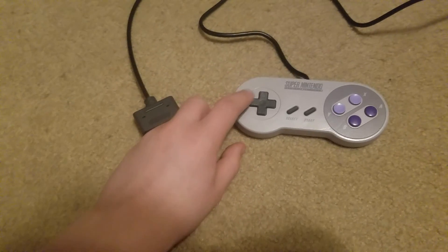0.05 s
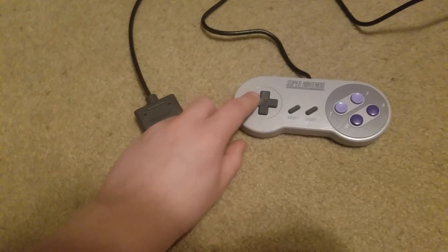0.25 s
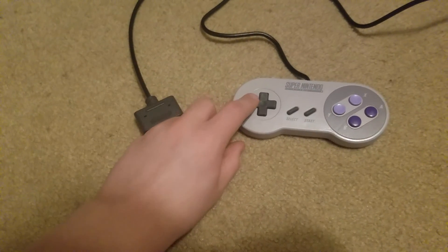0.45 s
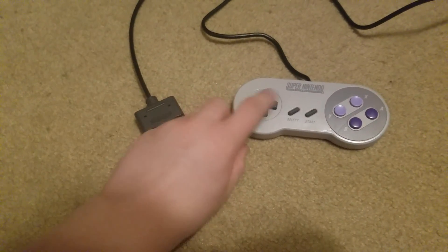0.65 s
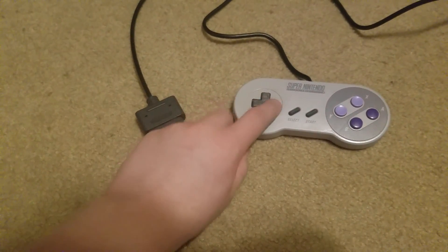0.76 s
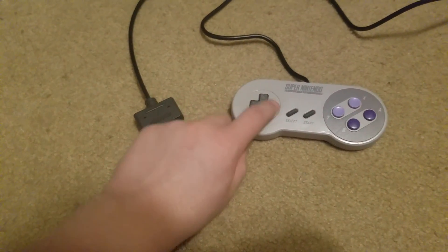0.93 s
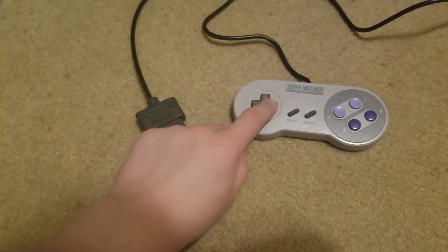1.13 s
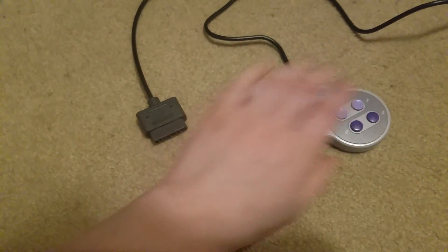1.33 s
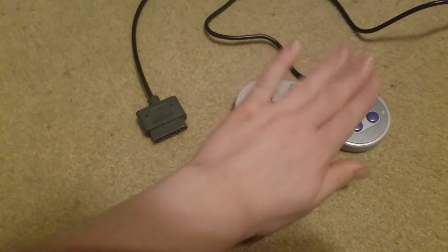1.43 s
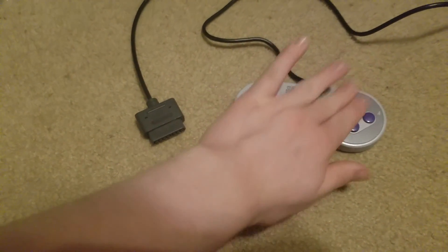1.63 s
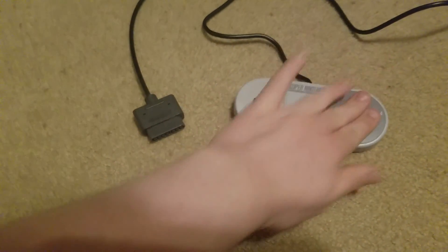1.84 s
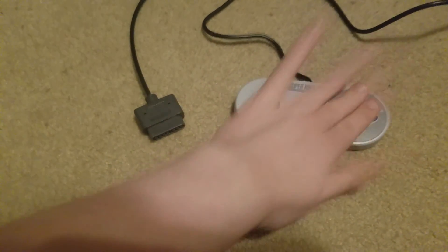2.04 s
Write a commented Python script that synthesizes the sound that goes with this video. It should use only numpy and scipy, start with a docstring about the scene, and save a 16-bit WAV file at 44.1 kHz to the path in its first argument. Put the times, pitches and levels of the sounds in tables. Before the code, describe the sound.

A game controller clicking under a finger, then three slaps with thumps and button rattles.

```python
"""Over a low hum, a finger faintly rubs and rocks the clicking direction pad of a plastic game controller.
Then the hand slaps the buttons three times: the case thumps on the carpet, the loose buttons rattle,
and after the first two slaps they tick back up as the fingers lift. Each contact is a brief force that
excites damped modes of the plastic. The small, quiet room adds a short reverberation."""
import sys
import numpy as np
from scipy import signal
from scipy.fft import rfft, irfft, next_fast_len
from scipy.io import wavfile

SR = 44100
rng = np.random.default_rng(int(sys.argv[2]) if len(sys.argv) > 2 else 0)


def unload_audio(sound):
    """Save the sound as a 16-bit wav file, at the path given as the first command line argument."""
    columns = np.transpose(np.atleast_2d(sound))
    # keep every value between -1 and 1, then stretch to whole-number steps
    steps = np.round(np.clip(columns, -1, 1) * 32767)
    wavfile.write(sys.argv[1], SR, steps.astype(np.int16))


N = 91728

# spectrum of the room air: (frequency [Hz], relative density [dB])
AIR_SPECTRUM = [(25, -14), (50, -4), (90, -5), (125, -6.5), (170, -8.5), (320, -9.5), (850, -17),
                (1300, -20.5), (2400, -24), (4600, -27.5), (8500, -35.5), (14500, -25)]
# likeness of diffuse sound at the two ears: (frequency [Hz], correlation [1])
EAR_COHERENCE = [(30, 0), (100, 0.63), (600, 0.19), (1500, 0.12), (4000, 0), (15000, 0.069)]
AIR_DB, HUM_HZ, HUM_DB = -67, 109.4, -71
# colour of the reverberant tail: (frequency [Hz], gain [dB])
ROOM_SPECTRUM = [(100, -7.5), (250, -17.5), (430, -9), (900, -10), (1700, -8.5), (3000, -7.5),
                 (6000, -12.5), (15000, -12.5)]
# reverberation time: (frequency [Hz], time to fall 60 dB [s])
ROOM_DECAY = [(100, 0.21), (500, 0.19), (2000, 0.18), (6000, 0.19), (15000, 0.15)]
ROOM_BUILD_S, WALL_ECHO_S, WALL_ECHO_DB, WALL_ECHO_HZ = 0.00092, .035, -21, 1970

# modes of the shell: (frequency [Hz], gain [dB], bandwidth [Hz], left minus right [dB])
SHELL_MODES = [(1410, -11.5, 244, -3), (1856, -4.5, 148, -1.5), (2052, -4.5, 220, -10.5),
               (2544, 0, 208, -10), (2730, -3, 367, -12.5), (3007, -2, 254, -6), (4110, -6, 285, -9),
               (5320, -15.5, 260, -10.5), (5500, -14, 190, -2)]
# hollow modes of the pad: (frequency [Hz], gain [dB], bandwidth [Hz], left minus right [dB])
PAD_MODES = [(1830, 2, 150, -4.5), (4070, 0, 230, -10), (5470, -5, 150, -18), (8000, -12, 100, -12)]
# deep and upper mode of the case on the carpet: (frequency [Hz], bandwidth [Hz])
CASE_MODES = [(122, 68), (315, 139)]
# the crack, a blur of short high modes: (frequency [Hz], gain [dB])
CRACK_SPECTRUM = [(400, -23), (700, -8), (1000, -18.5), (1500, -2), (3400, -11), (5300, -4.5), (8200, -5),
                  (10000, -8), (14000, -7.5), (16000, -13.5)]
# stereo balance of cracks and ticks: (frequency [Hz], left minus right [dB])
SNAP_BALANCE = [(1500, -3), (2500, -7), (5000, -8), (8000, -10.5), (10500, -1.5), (15000, 2.5)]
CRACK_RING_S = 0.00103

# loudness of skin rubbing on the pad: (time [s], level [dB])
RUB_LEVEL = [(0, -79.5), (.12, -71), (0.211, -64.5), (0.328, -72), (.42, -65), (.52, -66.5), (.65, -75),
             (.85, -74.5), (1.2, -72.5)]
# spectrum of the rubbing: (frequency [Hz], relative density [dB])
RUB_SPECTRUM = [(700, -9), (1400, -9), (1700, -5.5), (1870, 1.5), (2100, -7.5), (2700, -11), (4000, -18.5),
                (8000, -33)]

# buttons springing back: (time [s], tick [dB], scuff decay [s], ping [Hz], ping [dB], knock [dB])
BUTTON_LIFTS = [(1.5753, -29, 0.0025, 5300, -21, -35), (1.5879, -16, 0.0013, 7730, -8, -28),
                (1.5965, -17, .0007, 2050, -12.5, -22.5), (1.8337, -21, 0.002, 5060, -11, -20.5),
                (1.8395, -18.5, 0.0012, 5100, -17, -23), (1.8598, -14, 0.0043, 5160, -17, -23.5),
                (1.8681, -23, 0.0015, 3130, -18, -25), (1.8759, -19, 0.00059, 3240, -12, -18.5),
                (1.8787, -7, 0.00087, 2190, -1.5, -9)]
# colour of a button's tick: (frequency [Hz], gain [dB])
TICK_SPECTRUM = [(450, -12.5), (1000, -21), (1500, -0.5), (3400, -4.5), (5000, -0.5), (7500, -6),
                 (10000, -7), (15000, -8)]
LIFT_KNOCK_HZ, LIFT_KNOCK_WIDTH_HZ, PING_WIDTH_HZ = 690, 283, 245
TICK_EDGE_HZ, TICK_DB_PER_OCTAVE = 25000, 14   # a tick's top edge falls from here as it gets softer

# clicks of the pad: (time [s], shell ring [dB], crack [dB], scuff decay [s], hollow tone [dB])
PAD_CLICKS = [(0.1292, -17.5, -57, .0002, -37.5), (0.3744, -3, -27.5, 0.00031, -14.5),
              (0.699, -30, -35.5, .001, -41), (0.7203, 3.5, -31, 0.00011, -10.5),
              (0.7297, -11, -20.5, 0.0019, -14), (0.9675, -30, -36, 0.0011, -27),
              (0.9786, -13, -12.5, 0.0016, -10), (0.9808, -4.5, -5, 0.00075, 0.5),
              (0.999, -8, -13.5, 0.00048, -7.5), (1.127, -25.5, -50, 0.0014, -43)]
CLICK_THUMP_DB = -22
PAD_SOFT_HZ, PAD_ROOM_DB = 4600, -3   # the fingertip dulls the shell; the hand shades the room

# slaps of the hand: (time [s], shell ring [dB], crack [dB], deep thump [dB], upper thump [dB],
# knock [Hz], knock [dB], rattle [dB], rattle delay [s])
HAND_SLAPS = [(1.4268, -3, 3.5, 10.5, -3, 798, -6, 3.5, .004), (1.7275, 9.5, 9, 19, 16, 660, 10, 1, 0.0062),
              (2.004, 5.5, 9, 15, 15, 783, 12, -0.5, 0.0052)]
# further fingers landing just after a slap: (time [s], shell ring [dB], crack [dB])
FINGER_LANDINGS = [(1.4351, -2.5, -4.5), (2.0222, 4.5, -5.5)]
SLAP_SCUFF_S, SLAP_CRACK_S, THUMP_LAG_S, KNOCK_WIDTH_HZ = 0.0023, 0.00081, 0.00096, 93
RATTLES_PER_S, RATTLE_FADE_S, RATTLE_RING_DB, RATTLE_CRACK_DB = 770, 0.014, 1, 1.5


def from_db(db):
    """Amplitude ratio: tenfold for every 20 dB."""
    return 10 ** (np.asarray(db) / 20)


def at_hz(points, hz):
    """Interpolation of a table on a log-frequency axis."""
    frequencies, values = np.transpose(points)
    return np.interp(np.log(np.maximum(hz, 1)), np.log(frequencies), values)


def pan(db):
    """Level difference between the ears, left minus right, at constant total power."""
    gains = np.array([from_db(np.atleast_1d(db) / 2), from_db(-np.atleast_1d(db) / 2)])
    return gains / np.sqrt(np.mean(gains ** 2, axis=0))


def colour(x, points):
    """Minimum-phase filtering: folding the cepstrum makes the given dB curve causal."""
    size = 2 * next_fast_len(x.shape[-1])
    hz = np.arange(size // 2 + 1) * SR / size
    cepstrum = irfft(np.log(from_db(at_hz(points, hz))))
    cepstrum[1:size // 2] *= 2
    cepstrum[size // 2 + 1:] = 0
    return irfft(rfft(x, size) * np.exp(rfft(cepstrum)))[..., :x.shape[-1]]


def resonate(x, hz, width_hz):
    """Forced response of a damped oscillator, with unit gain at resonance."""
    r = np.exp(-np.pi * width_hz / SR)
    feedback = [1, -2 * r * np.cos(2 * np.pi * hz / SR), r * r]
    return signal.lfilter(np.array([1, 0, -1]) * (1 - r * r) / 2, feedback, x + 1e-18)


def resonate_twice(x, hz, width_hz):
    """Two resonators in cascade, each of twice the given width, make a peak with steep skirts."""
    return resonate(resonate(x, hz, 2 * width_hz), hz, 2 * width_hz)


def add(track, s, sound):
    """Superposition: a sound joins the track at s seconds."""
    i = int(s * SR)
    track[..., i:i + sound.shape[-1]] += sound[..., :max(N - i, 0)]


def stereo_noise(size):
    """Partial coherence: white noise that is alike at the two ears mainly in the bass."""
    mid, side = rfft(rng.standard_normal((2, size)))
    alike = np.clip(at_hz(EAR_COHERENCE, np.arange(len(mid)) * SR / size), -1, 1)
    return irfft(np.sqrt(1 + alike) * mid + np.sqrt(1 - alike) * side * [[1], [-1]], size)


def hiss(spectrum):
    """Stationary coloured noise of unit rms."""
    x = colour(stereo_noise(N + SR // 4), spectrum)[:, -N:]
    return x / x.std()


def background():
    """Ambient noise floor: broadband room air and a low sinusoidal hum."""
    hum = np.sqrt(2) * np.sin(2 * np.pi * (HUM_HZ * np.arange(N) / SR + rng.random()))
    return (from_db(AIR_DB) * hiss(AIR_SPECTRUM) + from_db(HUM_DB) * hum) * pan(db=-1)


def room(x):
    """Reverberation: a diffuse tail decays exponentially in each band, and one wall gives a dull echo."""
    t = np.arange(SR // 2) / SR
    noise, tail = rfft(stereo_noise(len(t))), 0
    hz = np.arange(noise.shape[1]) * SR / len(t)
    edges_hz = np.geomspace(40, 20480, 10)
    build_up = 1 - np.exp(-(t / ROOM_BUILD_S) ** 2)
    for low, high in zip(edges_hz, edges_hz[1:]):
        band = irfft(noise * ((hz >= low) & (hz < high)), len(t))
        fade = from_db(-60 * t / at_hz(ROOM_DECAY, np.sqrt(low * high))) * build_up
        tail = tail + band * fade / np.sqrt(np.sum(fade ** 2))
    reflections = signal.fftconvolve(x, colour(tail, ROOM_SPECTRUM), axes=1)[:, :N]
    echo = signal.lfilter(*signal.butter(1, WALL_ECHO_HZ, fs=SR), x)
    add(reflections, WALL_ECHO_S, from_db(WALL_ECHO_DB) * echo)
    return reflections


def finger_rub():
    """Friction noise: skin slides faintly over the pad."""
    level_db = np.interp(np.arange(N) / SR, *np.transpose(RUB_LEVEL))
    return from_db(level_db) * hiss(RUB_SPECTRUM) * pan(db=-6)


def scuff(decay_s, flattening_passes=4):
    """Broadband excitation: the force of one contact is a dying burst of tiny slips, of unit energy."""
    fade = np.exp(-np.arange(SR // 40) / SR / decay_s)
    force = rng.standard_normal(len(fade)) * fade
    for _ in range(flattening_passes):   # even out the spectrum while keeping the burst short
        spectrum = rfft(force)
        force = irfft(spectrum / (abs(spectrum) + 1e-12), len(fade)) * np.minimum(1, 10 * fade)
    return force / np.sqrt(np.sum(force ** 2))


def crack(contact_s):
    """Modal overlap: short high modes blur into a snap of noise, different at each ear."""
    return np.array([scuff(contact_s / 2 + CRACK_RING_S) for _ in range(2)])


def radiate(snap, spectrum):
    """Frequency-dependent radiation: a snap is coloured and leans to one side, band by band."""
    hz, balance_db = np.transpose(SNAP_BALANCE)
    ear_curves = [np.c_[hz, 20 * np.log10(gain)] for gain in pan(balance_db)]
    return np.array([colour(ear, curve) for ear, curve in zip(colour(snap, spectrum), ear_curves)])


def body(force, modes):
    """Modal superposition: one force drives modes of alternating sign, each with its own balance."""
    return sum((-1) ** k * from_db(db) * pan(pan_db) * resonate(force, hz, width_hz)
               for k, (hz, db, width_hz, pan_db) in enumerate(modes))


def case_thump(deep_force, upper_force):
    """Mass on a spring: the case bounces on the carpet in two low modes."""
    bounce = resonate(deep_force, *CASE_MODES[0]) - resonate(upper_force, *CASE_MODES[1])
    return signal.sosfilt(signal.butter(2, [85, 600], "band", fs=SR, output="sos"), bounce) * pan(db=-3)


def button_lifts():
    """Elastic return: each button springs against its stop with a tick, a ping and a small knock."""
    (ping, knock), snap = np.zeros((2, N)), np.zeros((2, N))
    for s, tick_db, decay_s, ping_hz, ping_db, knock_db in BUTTON_LIFTS:
        force = scuff(decay_s)
        edge_hz = min(TICK_EDGE_HZ * 2 ** (tick_db / TICK_DB_PER_OCTAVE), SR / 2 - 1000)
        tick = signal.lfilter(*signal.butter(2, edge_hz, fs=SR), crack(decay_s))
        add(snap, s, from_db(tick_db) * tick)
        add(ping, s, from_db(ping_db) * resonate(force, ping_hz, PING_WIDTH_HZ))
        add(knock, s, from_db(knock_db) * force)
    knock = resonate_twice(knock, LIFT_KNOCK_HZ, LIFT_KNOCK_WIDTH_HZ)
    return radiate(snap, TICK_SPECTRUM) + ping * pan(db=-14.5) + knock


def pad_clicks():
    """Impact excitation: the rocking pad cracks, rings the shell and its own modes, and jolts the case."""
    ring, hollow, snap = np.zeros(N), np.zeros(N), np.zeros((2, N))
    for s, ring_db, crack_db, decay_s, hollow_db in PAD_CLICKS:
        add(ring, s, from_db(ring_db) * scuff(decay_s))
        add(hollow, s, from_db(hollow_db) * scuff(decay_s))
        add(snap, s, from_db(crack_db) * crack(decay_s))
    push = from_db(CLICK_THUMP_DB) * (ring + 3.7 * hollow)
    dulled = signal.lfilter(*signal.butter(2, PAD_SOFT_HZ, fs=SR), ring)
    ringing = body(dulled, SHELL_MODES) + body(hollow, PAD_MODES)
    return ringing + radiate(snap, CRACK_SPECTRUM) + case_thump(push, push)


def button_rattle():
    """Random collisions: loose buttons chatter in their holes and settle; unit energy."""
    t = np.arange(SR // 10) / SR
    hits = rng.random(len(t)) < RATTLES_PER_S / SR
    force = hits * rng.choice([-1, 1], len(t)) * np.exp(-t / RATTLE_FADE_S)
    return force / np.sqrt(np.sum(force ** 2) + 1e-12)


def hand_slaps():
    """Impulse response: the slapped controller rings, cracks, knocks and thumps; its buttons rattle."""
    (ring, deep, upper, knock), snap = np.zeros((4, N)), np.zeros((2, N))
    tap = signal.unit_impulse(SR // 10)
    for s, ring_db, crack_db, deep_db, upper_db, knock_hz, knock_db, rattle_db, delay_s in HAND_SLAPS:
        add(ring, s, from_db(ring_db) * scuff(SLAP_SCUFF_S))
        add(snap, s, from_db(crack_db) * crack(SLAP_CRACK_S))
        add(deep, s + THUMP_LAG_S, from_db(deep_db) * tap)
        add(upper, s + THUMP_LAG_S, from_db(upper_db) * tap)
        add(knock, s, from_db(knock_db) * resonate_twice(tap, knock_hz, KNOCK_WIDTH_HZ))
        chatter = from_db(rattle_db) * button_rattle()
        add(ring, s + delay_s, from_db(RATTLE_RING_DB) * chatter)
        add(snap, s + delay_s, from_db(RATTLE_CRACK_DB) * signal.fftconvolve(chatter[None], crack(0)))
    for s, ring_db, crack_db in FINGER_LANDINGS:
        add(ring, s, from_db(ring_db) * scuff(SLAP_SCUFF_S))
        add(snap, s, from_db(crack_db) * crack(SLAP_SCUFF_S))
    return body(ring, SHELL_MODES) + radiate(snap, CRACK_SPECTRUM) + knock + case_thump(deep, upper)


def scene():
    """Superposition of the controller's direct sound, its reflections and the noise floor."""
    pad, buttons = pad_clicks(), hand_slaps() + button_lifts()
    return pad + buttons + room(from_db(PAD_ROOM_DB) * pad + buttons) + finger_rub() + background()


def record(dry):
    """Band limiting: the bass rolls off below 40 Hz and the treble is cut steeply above 16 kHz."""
    x = signal.sosfilt(signal.butter(2, 40, "high", fs=SR, output="sos"), dry)
    return signal.sosfilt(signal.ellip(10, .1, 70, 16000, fs=SR, output="sos"), x)


dry = scene()
out = record(dry)
unload_audio(out)
```